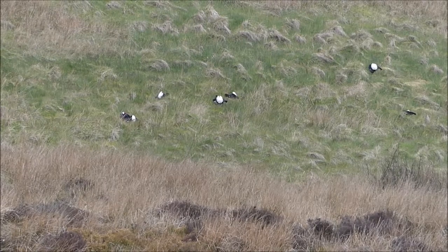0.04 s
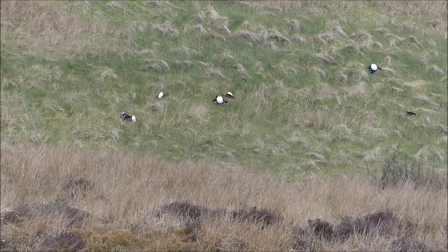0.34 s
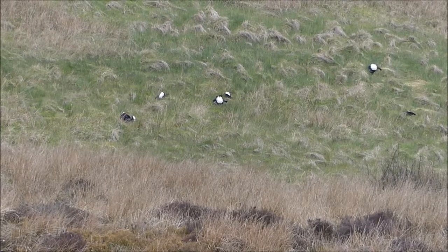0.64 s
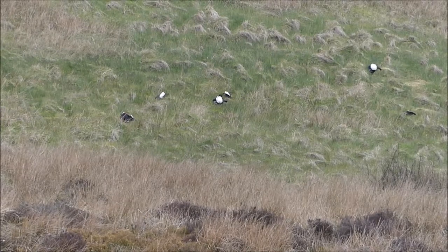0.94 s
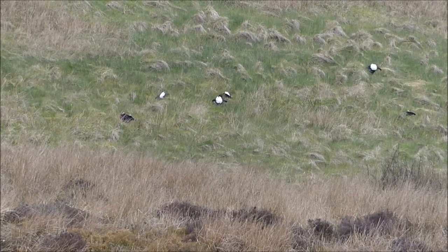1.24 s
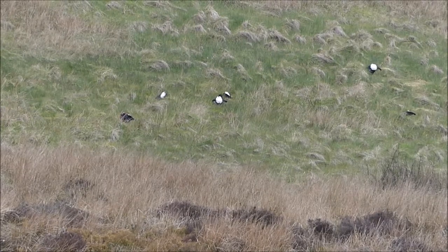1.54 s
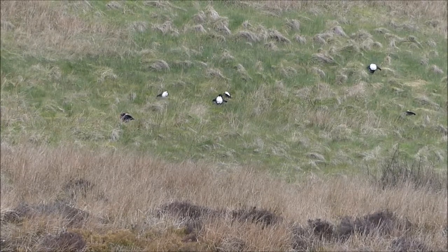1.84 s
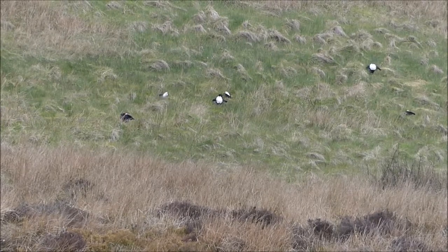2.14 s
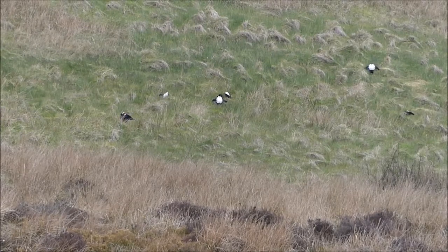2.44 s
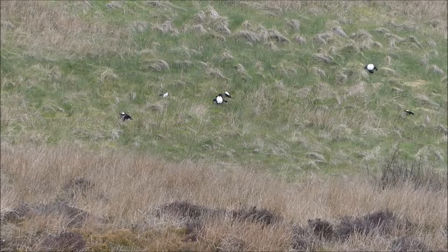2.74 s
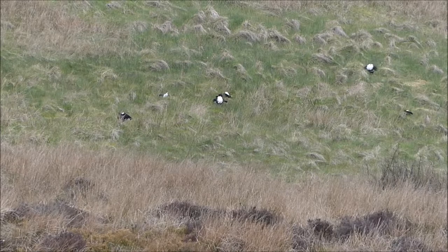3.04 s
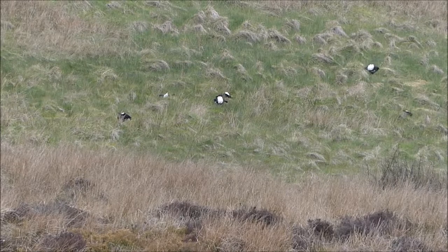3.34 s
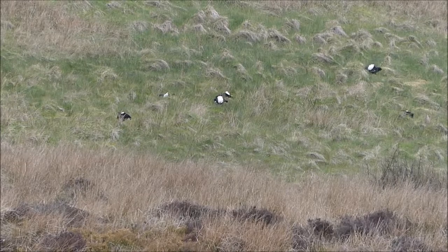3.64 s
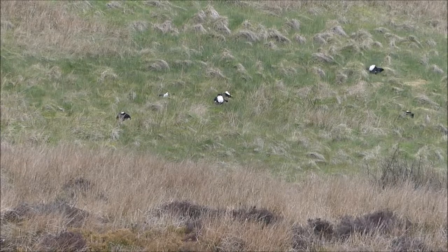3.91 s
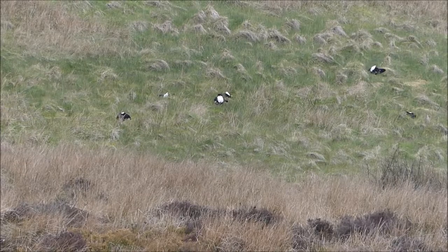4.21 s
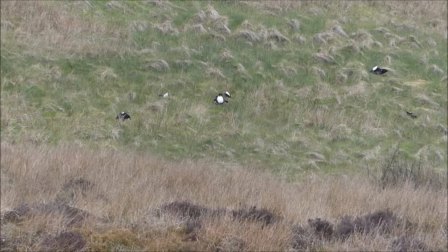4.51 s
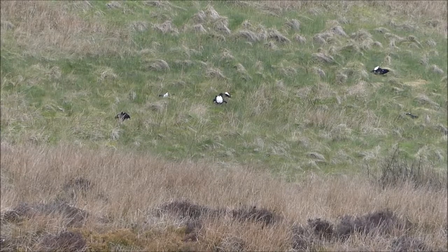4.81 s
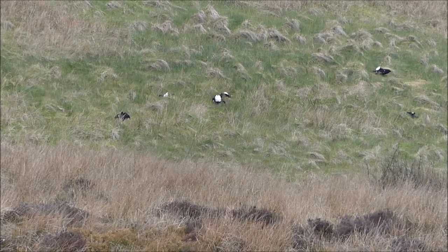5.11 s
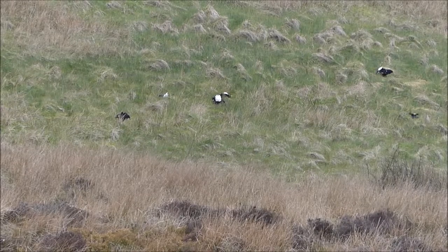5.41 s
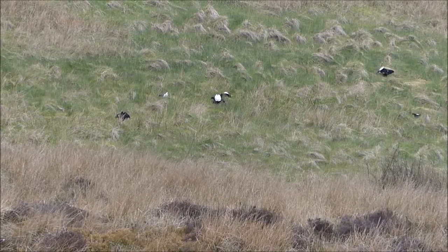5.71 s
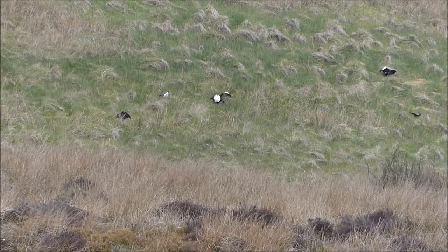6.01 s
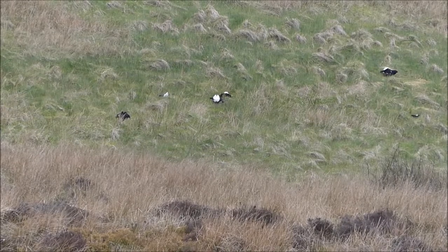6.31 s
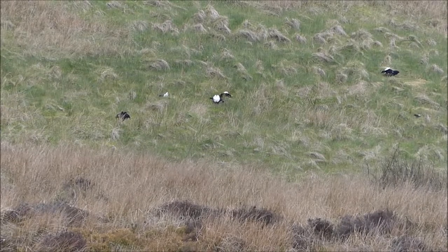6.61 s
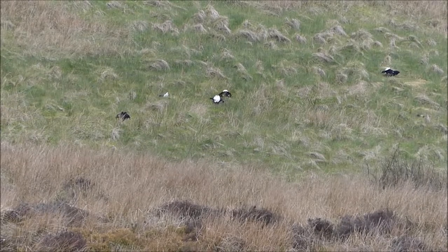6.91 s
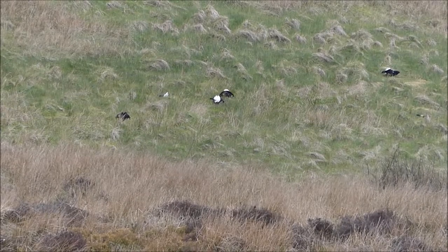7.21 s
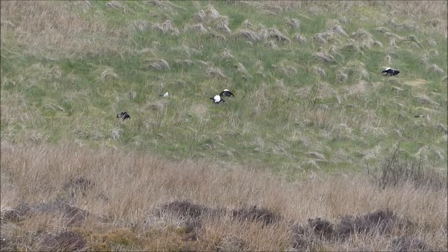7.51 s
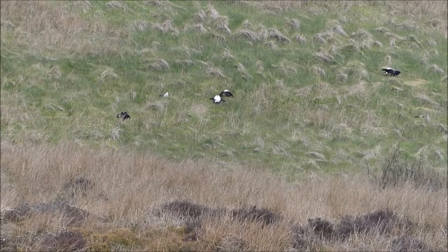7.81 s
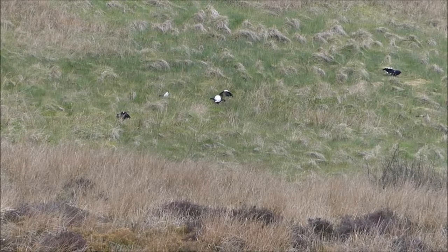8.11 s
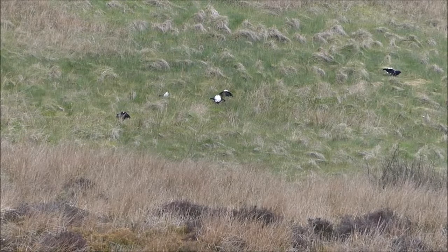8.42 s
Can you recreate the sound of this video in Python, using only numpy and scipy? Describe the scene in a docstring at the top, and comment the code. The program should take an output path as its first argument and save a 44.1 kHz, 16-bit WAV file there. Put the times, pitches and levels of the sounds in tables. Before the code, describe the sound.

Wind gusts buffet the microphone on an open moor as a grouse gives one short rattling call over faint hiss.

```python
"""A camera's faint hiss and whirr come first, with small birds ticking on an open moor.
A lens motor whines briefly and the case knocks. Then gusts buffet the microphone: trains of eddies
that sound higher as they grow stronger. Through them a grouse gives one short rattling call, runs of
sharp pulses ringing its throat and beak. Gain control ducks the mix, hiss too, in the strongest gust."""
import sys
import numpy as np
from scipy import signal
from scipy.fft import rfft, irfft, next_fast_len
from scipy.io import wavfile
from scipy.ndimage import uniform_filter1d, map_coordinates

SR = 44100
rng = np.random.default_rng(int(sys.argv[2]) if len(sys.argv) > 2 else 0)


def generate_wav(sig):
    """Save sig (samples, or channels by samples) to the path in sys.argv[1] as 16-bit PCM at SR."""
    pcm = np.round(np.clip(np.atleast_2d(sig).T, -1, 1) * 32767).astype(np.int16)
    wavfile.write(sys.argv[1], SR, pcm)


N = 377055

# colour of the microphone's own hiss: frequency_hz, density_db
HISS_COLOUR = [(25, -3), (100, -6.5), (1500, -2), (3000, -3), (4800, -5), (5250, 1), (6800, 1.5),
               (7600, -2), (8500, 0.5), (9900, 3.5), (11500, 0.5), (14500, -0.5), (15700, -4)]
# colour of the camera mechanism's whirr: frequency_hz, density_db
WHIRR_COLOUR = [(25, -21), (50, -21), (85, -4.5), (290, -0.5), (372, -3), (420, -1.5), (490, 0), (660, -8),
                (800, -5), (970, -3), (1200, -12.5), (2400, -18), (4000, -28.5)]
# slow level ride on the whirr: time_s, gain_db
WHIRR_RIDE = [(0, -0.5), (.4, 3.5), (.8, 2.5), (2, 2), (3.6, 2.5), (5, 4), (7, 2), (8.55, -1)]
# soft knocks in the camera body: start_s, level_db, t60_s
CASE_KNOCKS = [(0.374, -63, 0.092), (2.151, -50.5, 0.1), (2.93, -56, 0.071), (3.453, -47, 0.045),
               (3.736, -54.5, 0.14)]
# colour of those knocks: frequency_hz, density_db
CASE_COLOUR = [(40, -5), (120, 6.5), (300, 7.5), (700, -2), (1300, -9), (3000, -25), (8000, -50)]
# thin falling ticks of small birds: start_s, relative_db, start_hz, end_hz
BIRD_TICKS = [(0.38, -58, 5700, 5000), (1.949, -48.5, 7940, 1960), (3.858, -57, 7100, 5700),
              (4.606, -57, 6000, 3800), (5.801, -50.5, 7144, 4280), (5.827, -51.5, 6930, 3760),
              (5.833, -48.5, 6600, 3900), (5.885, -53.5, 6690, 4000), (5.916, -50, 6170, 3800),
              (8.416, -55.5, 6540, 5882), (8.451, -58, 6600, 6340)]
# gusts at the microphone: start_s, hold_s, strength_db
WIND_GUSTS = [(0.685, 0.015, -54), (0.859, 0.18, -51), (1.19, 0.093, -59), (2.931, 0.03, -54),
              (3.226, 0.053, -55), (3.363, 0.096, -50.5), (4.013, 0.18, -29), (4.199, 0.24, -36),
              (4.57, 0.17, -25.5), (4.769, 0.062, -33), (4.96, 0.24, -41), (5.23, 0.54, -21),
              (5.74, 0.34, -15), (6.15, 0.29, -21.5), (6.561, 0.27, -33), (6.858, 0.12, -49),
              (7.398, 0.27, -50), (7.77, 0.28, -44.5), (8.157, 0.054, -43.5), (8.218, 0.16, -30.5),
              (8.466, 0.067, -31)]
# the hardest thumps of wind: peak_s, relative_db
WIND_THUMPS = [(1.022, -46), (3.382, -47), (3.432, -48), (4.156, -21.5), (4.363, -28), (4.453, -26.5),
               (4.573, -21), (4.686, -18), (4.828, -23), (5.237, -16), (5.296, -18), (5.341, -19),
               (5.45, -20), (5.574, -18), (5.679, -18), (5.754, -12), (5.809, -15), (5.866, -13),
               (5.914, -13), (6.004, -13), (6.054, -17.5), (6.19, -13), (6.38, -15.5), (6.434, -15.5),
               (6.501, -20.5), (6.799, -25), (8.272, -24), (8.519, -21.5)]
# colour of turbulence centred at EDDY_HZ: frequency_hz, density_db
EDDY_COLOUR = [(20, -19.5), (70, -6.5), (140, 3.5), (250, -1), (380, -10.5), (550, -23.5), (800, -42.5),
               (1100, -55), (2400, -62), (5000, -86.5)]
# tone of the hollow behind the microphone ports: frequency_hz, gain_db
PORT_HOLLOW = [(60, 1.5), (100, 0.5), (170, 1), (250, 0), (400, -0.5), (600, 4.5), (760, 2), (930, 3),
               (1200, 0)]
# how far wind in the right port trails the left: frequency_hz, lag_rad
RIGHT_PORT_LAG = [(20, 5), (85, .5), (130, 0.54), (215, 1.02), (300, 1.47), (400, 1.5), (560, 2.5),
                  (1500, 4.5)]
# wind level in the right port against the left: frequency_hz, gain_db
RIGHT_PORT_GAIN = [(60, -4), (150, 0.5), (250, 4), (350, 9), (520, 6), (1000, 10), (1400, -1.5)]
# grouse syllables, each around its loudest pulse: peak_s, relative_db, swell_s, fade_s, open_hz
CALL_SYLLABLES = [(4.855, -59, 0.04, 0.028, 2200), (4.945, -58, 0.046, 0.025, 2300),
                  (5.014, -39, 0.026, 0.011, 2400), (5.081, -33.5, 0.044, 0.021, 2390),
                  (5.158, -33.5, 0.047, 0.015, 2614), (5.232, -31.5, 0.045, 0.016, 2560),
                  (5.31, -35.5, 0.057, 0.018, 2390)]
# the grouse's fixed resonances: centre_hz, width_hz, gain_db
THROAT_MODES = [(720, 200, -18), (950, 150, -20), (1170, 150, -26), (1654, 50, -14), (1897, 55, 4.5),
                (2110, 50, -15), (2360, 70, -8)]
# resonances that move as the throat opens: ratio_to_upper_resonance, width_hz, gain_db
BEAK_MODES = [(1, 168, 4.5), (1.075, 172.6, 2), (1.19, 220, -4.5)]
# how the call carries to the microphone: frequency_hz, gain_db
CARRY_EQ = [(300, -11), (700, 7.5), (3050, -1.5), (3400, 4), (4100, 0.5), (4800, -17), (9000, -47)]

EDDY_HZ, SLOWEST_EDDY_HZ = 200, 84.63
SIDE = np.array([[1], [-1]])  # opposite polarity left and right


def amp(db):
    """Decibels to gain."""
    return 10 ** (np.asarray(db) / 20)


def unit(x):
    """Scale to rms 1."""
    return x / np.sqrt(np.mean(x ** 2) + 1e-20)


def along(points, hz):
    """Read (frequency_hz, value) points on a log frequency axis."""
    frequencies, values = np.transpose(points)
    return np.interp(np.log(hz + 1), np.log(frequencies + 1), values)


def clock():
    """Each sample's time in seconds."""
    return np.arange(N) / SR


def wobble(rate):
    """Smooth random modulation, rate knots a second."""
    return map_coordinates(rng.standard_normal(int(N * rate / SR) + 4), [clock() * rate])


def filtered(x, response):
    """Filter x by a complex frequency response."""
    size = next_fast_len(N + SR // 2)
    return irfft(rfft(x, size) * response(np.fft.rfftfreq(size, 1 / SR)), size)[..., :N]


def noise(colour):
    """Coloured noise of rms 1."""
    return unit(filtered(rng.standard_normal(N), lambda hz: amp(along(colour, hz))))


def resonances(modes, hz):
    """Response of parallel band-passes: centre_hz, width_hz, gain_db."""
    return sum(amp(db) * 1j * hz * width / (centre ** 2 - hz ** 2 + 1j * hz * width)
               for centre, width, db in modes)


def smooth(x, seconds):
    """Centre-weighted running mean of a positive signal."""
    size = max(int(seconds * SR), 1)
    return np.abs(uniform_filter1d(uniform_filter1d(x, size), size))


def swells(rows, half_length_s):
    """An envelope with one bell-shaped swell per row: peak_s, level_db."""
    t, envelope = clock(), np.zeros(N)
    for peak_s, db in rows:
        near = slice(*np.searchsorted(t, [peak_s - .1, peak_s + .1]))
        bell = 2 ** (-2 * ((t[near] - peak_s) / half_length_s) ** 2)
        envelope[near] = np.maximum(envelope[near], amp(db) * bell)
    return envelope


def camera_bed(hiss_db=-65, hiss_side_db=-10.5, side_db=-61, mid_db=-69, hum_db=-73, hum_hz=372):
    """Steady, mostly centred hiss; the mechanism's whirr shakes the two ports in opposite directions."""
    hiss = noise(HISS_COLOUR) + amp(hiss_side_db) * noise(HISS_COLOUR) * SIDE
    hum = unit(filtered(rng.standard_normal(N), lambda hz: resonances([(hum_hz, 40, 0)], hz) ** 2))
    whirr = amp(side_db) * noise(WHIRR_COLOUR) * SIDE + amp(mid_db) * noise(WHIRR_COLOUR)
    ride_db = np.interp(clock(), *np.transpose(WHIRR_RIDE)) + .37 * wobble(.77)
    return amp(hiss_db) * hiss + (whirr + amp(hum_db) * hum) * amp(ride_db)


def lens_motor(on_s=2.14, off_s=3.44, ramp_s=.041, level_db=-69.5, whine_hz=808, step_hz=25.5):
    """A small motor whines in quick, uneven steps."""
    t = clock()
    steps = np.sin(np.pi * step_hz * t + .5 * wobble(9.6)) ** 2 * amp(1.7 * wobble(12))
    busy = np.clip((wobble(23) + .74) / .54, 0, 1)  # brief rests between runs of steps
    whine = np.sin(2 * np.pi * whine_hz * t + .93 * wobble(29))
    running = np.clip(np.minimum(t - on_s, off_s - t) / ramp_s, 0, 1)
    return amp(level_db) * running * unit(busy * steps * whine)


def case_knocks(attack_s=.0016):
    """The case gives a few dull knocks, two of them as the motor starts and stops."""
    t = clock()
    blows = sum(amp(db - 60 * np.abs(t - start_s) / t60_s) * np.clip((t - start_s) / attack_s, 0, 1)
                for start_s, db, t60_s in CASE_KNOCKS)
    return blows * (noise(CASE_COLOUR) + .5 * noise(CASE_COLOUR) * SIDE)


def small_birds(trim_db=-5, tick_s=.009):
    """Each tick is a ragged whistle that falls within a few milliseconds."""
    whistles = np.zeros(N + SR)
    length = int(tick_s * SR)
    arch = np.sin(np.linspace(0, np.pi, length))
    for start_s, db, start_hz, end_hz in BIRD_TICKS:
        phase = 2 * np.pi * np.cumsum(np.linspace(start_hz, end_hz, length)) / SR
        whistles[round(start_s * SR):][:length] += amp(db + trim_db) * arch * np.sin(phase)
    return whistles[:N] * (.4 + wobble(3000))  # fast modulation roughens the tone


def gusts(breeze_db=-69, rise_s=.03, fall_s=.039):
    """Wind strength: gusts rise, hold and die over a light breeze, 20 dB per rise_s or fall_s."""
    t, strength = clock(), np.zeros(N)
    for start_s, hold_s, db in WIND_GUSTS:
        outside = np.maximum(start_s - t, 0) / rise_s + np.maximum(t - start_s - hold_s, 0) / fall_s
        strength = np.maximum(strength, amp(db - 20 * outside))
    return amp(breeze_db) + strength


def shedding(spacing_s=.046, spacing_scatter=.3, scatter_db=2, between_db=-10.5):
    """The flutter in a gust as its train of eddies passes at uneven intervals."""
    gap, size = rng.standard_normal((240, 2)).T
    times = np.cumsum(spacing_s * np.exp(spacing_scatter * gap))
    return np.maximum(amp(between_db), swells(zip(times, scatter_db * size), half_length_s=.016))


def turbulence(speed, low_cut_hz=88):
    """Faster eddies sweep past sooner and sound higher: varispeed noise through a low cut."""
    def low_cut(hz):
        s = 1j * hz / low_cut_hz
        return s ** 2 / (1 + np.sqrt(2) * s + s ** 2)
    swept = map_coordinates(noise(EDDY_COLOUR), [np.cumsum(speed)], mode="wrap")
    return filtered(swept, low_cut)


def ports(pressure):
    """Wind rings the microphone's hollow and comes out later and mostly stronger on the right."""
    def response(hz):
        right = np.sqrt(amp(along(RIGHT_PORT_GAIN, hz))) * np.exp(-.5j * along(RIGHT_PORT_LAG, hz))
        return amp(along(PORT_HOLLOW, hz)) * np.array([1 / right, right])
    return filtered(pressure, response)


def wind(flow_db=-1.2, lumps_db=1.52, thump_db=-.44, thump_push=.6, side_db=-18,
         inertia_s=.03, centre_db=-22, db_per_octave=24):
    """Turbulence on the microphone swells with each eddy and thump; stronger wind sounds higher."""
    strength = gusts()
    flow = strength * shedding() * amp(flow_db + lumps_db * wobble(45))
    level = np.maximum(flow, amp(thump_db) * swells(WIND_THUMPS, half_length_s=.013))
    surge = np.exp(.08 * wobble(90))  # brief surges are both stronger and quicker
    push = np.maximum(strength, thump_push * level)  # thumps also speed the air
    push_db = 10 * np.log10(smooth(push ** 2, inertia_s) + 1e-12)
    octaves = (push_db - centre_db) / db_per_octave  # above EDDY_HZ
    speed = surge * np.maximum(2 ** octaves, SLOWEST_EDDY_HZ / EDDY_HZ)
    pressure = turbulence(speed)
    pressure /= np.sqrt(smooth(pressure ** 2, .023) + 1e-9)  # flatten, so the eddies set the dynamics
    spread = amp(side_db) * unit(turbulence(speed))  # small eddies differ between the ports
    return ports(level * surge * pressure) + level * spread * SIDE


def beak_ring(upper_hz):
    """One pulse rings the moving resonances, which alternate in polarity."""
    t = np.arange(SR // 30) / SR
    ring = np.zeros(len(t))
    for k, (ratio, width_hz, db) in enumerate(BEAK_MODES):
        decay = 2 * np.pi * width_hz / SR * np.exp(-np.pi * width_hz * t)
        ring += (-1) ** (k + 1) * amp(db) * decay * np.cos(2 * np.pi * ratio * upper_hz * t)
    return ring


def hillside(call, t60_s=.22, wet_db=-14):
    """Rough ground scatters a short, faint tail to each side."""
    t = np.arange(SR // 2) / SR
    tail = rng.standard_normal((2, len(t))) * amp(-60 * t / t60_s)
    tail /= np.linalg.norm(tail[0])
    return amp(wet_db) * signal.fftconvolve(call[None], tail, axes=1)[:, :N]


def grouse(pulse_hz=236, drive_db=27, range_db=25, scatter_db=1, jitter_s=.00008, shut_hz=2850):
    """Swelling runs of sharp pulses; the upper resonance dips as the throat opens, climbs as it shuts."""
    pulses, beak = np.zeros(N), np.zeros(N)
    offsets_s = np.arange(-11, 7) / pulse_hz
    for peak_s, db, swell_s, fade_s, open_hz in CALL_SYLLABLES:
        away = np.where(offsets_s < 0, -offsets_s / swell_s, offsets_s / fade_s)  # 0 open, 1 shut
        sizes = amp(db + drive_db - range_db * away + scatter_db * rng.standard_normal(len(away)))
        times = peak_s + offsets_s + jitter_s * rng.standard_normal(len(away))
        onsets = np.round(times * SR).astype(int)
        for onset, size, shut in zip(onsets, sizes, np.minimum(away, 1) ** 2):
            pulses[onset] += size * (1 - shut) ** 2
            ring = beak_ring(open_hz + (shut_hz - open_hz) * shut)
            beak[onset:onset + len(ring)] += size * (1 + shut) * ring
    beak = filtered(beak, lambda hz: 1 / (1 + (hz / 3300) ** 16))  # steep high cut
    hardest = pulses ** 3 / pulses.max() ** 2  # only the hardest pulses rasp
    rasp = filtered(hardest, lambda hz: resonances([(3720, 540, -22)], hz))
    throat = filtered(pulses, lambda hz: resonances(THROAT_MODES, hz))
    return filtered(beak + rasp + throat, lambda hz: amp(along(CARRY_EQ, hz)))


def scene():
    """The grouse stands to the left; the wind is right at the microphone."""
    call = grouse()
    moor = call * amp([[3], [-3.5]]) + hillside(call) + small_birds()
    return moor + wind() + lens_motor() + case_knocks() + camera_bed()


def record(dry, threshold_db=-27, depth=.5, sense_s=.18, release_s=.4, top_hz=15730):
    """Gain control ducks loud gusts and recovers slowly; a brick-wall filter trims the top."""
    loud_db = 10 * np.log10(smooth(np.mean(dry ** 2, axis=0), sense_s) + 1e-12)
    over_db = np.maximum(loud_db - threshold_db, 0)
    release = np.exp(-clock() / release_s)
    held_db = np.maximum.accumulate(over_db / release) * release
    return filtered(dry * amp(-depth * held_db), lambda hz: hz < top_hz)


dry = scene()
out = record(dry)
generate_wav(out)
```